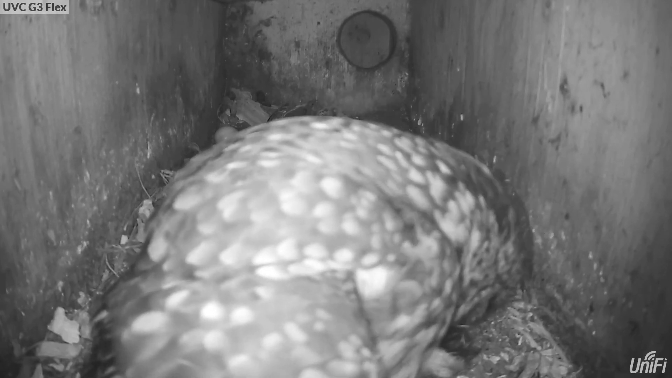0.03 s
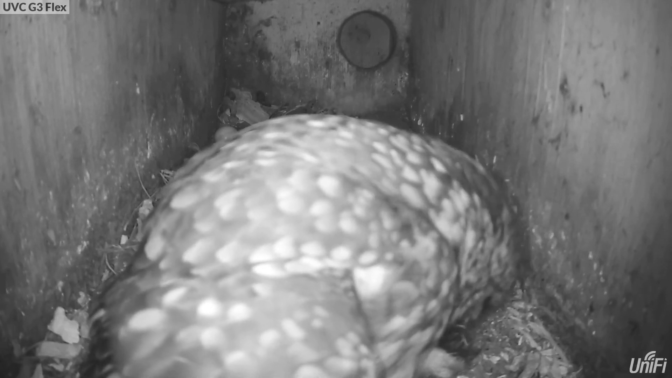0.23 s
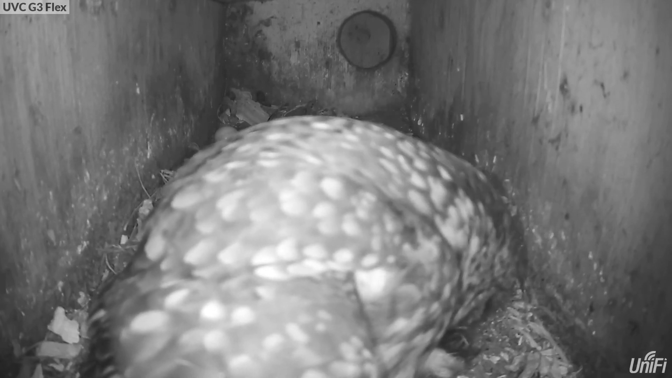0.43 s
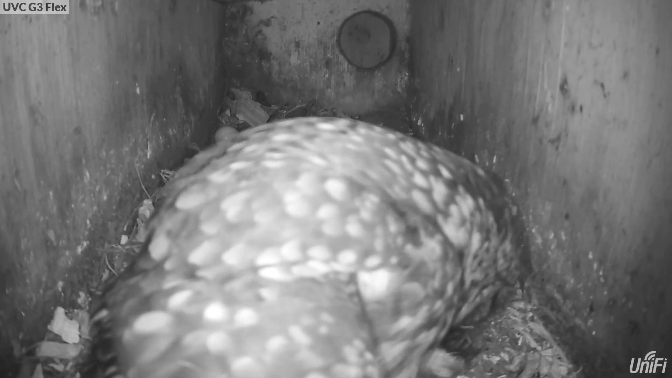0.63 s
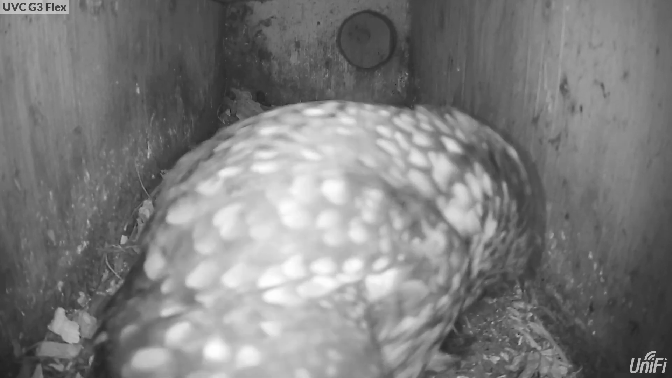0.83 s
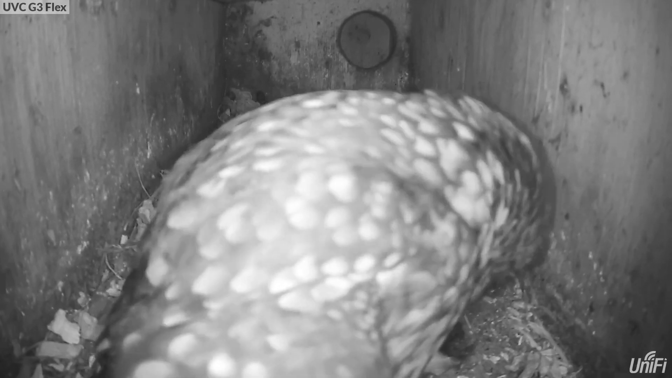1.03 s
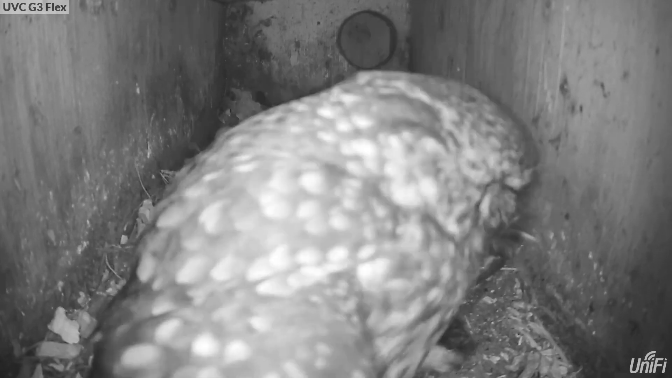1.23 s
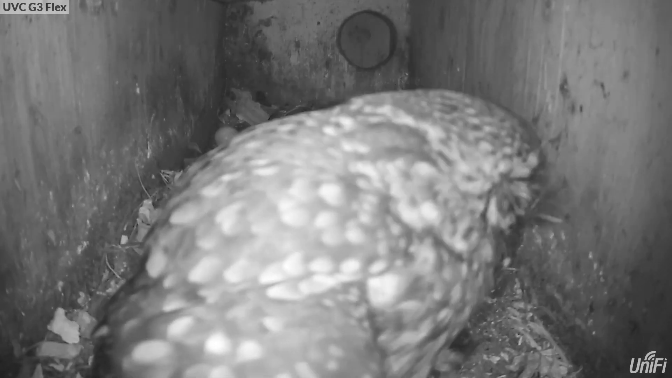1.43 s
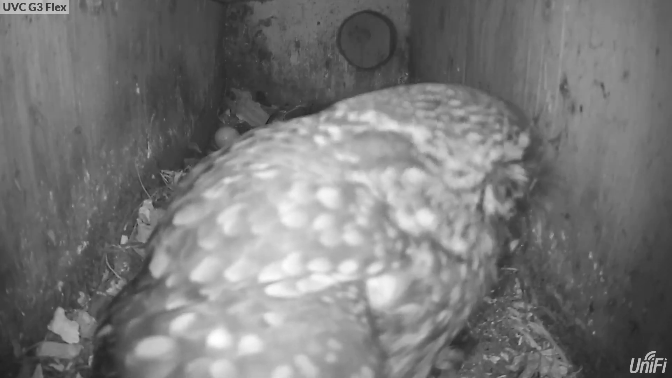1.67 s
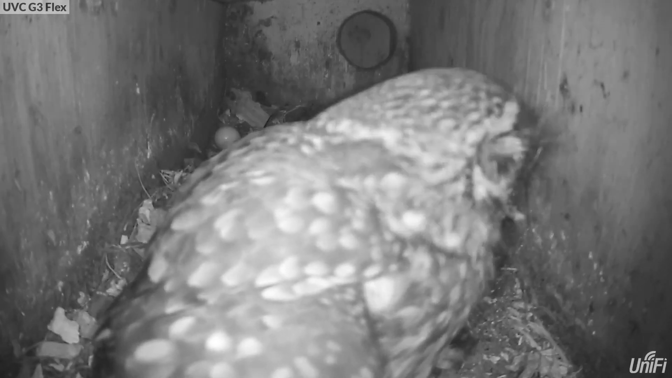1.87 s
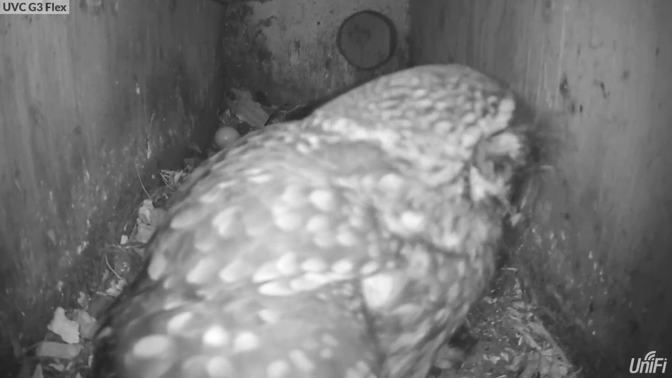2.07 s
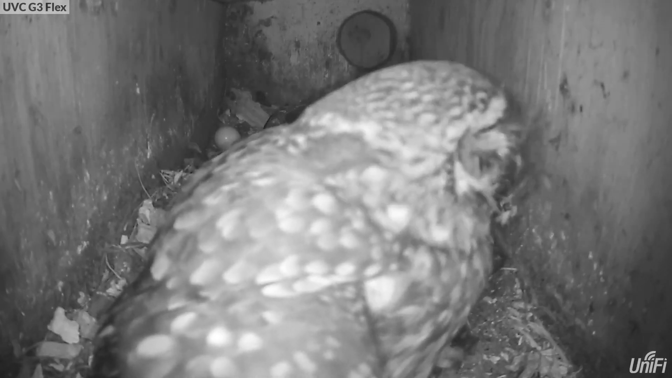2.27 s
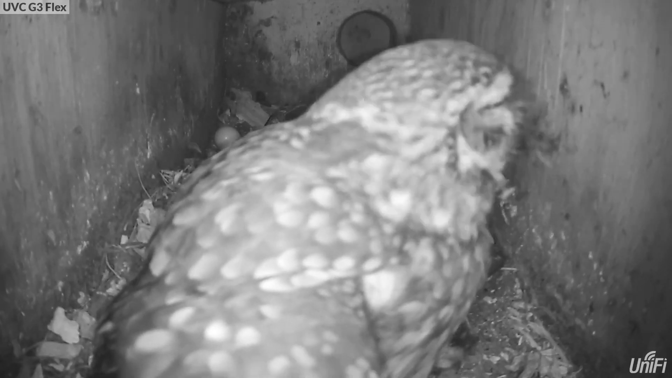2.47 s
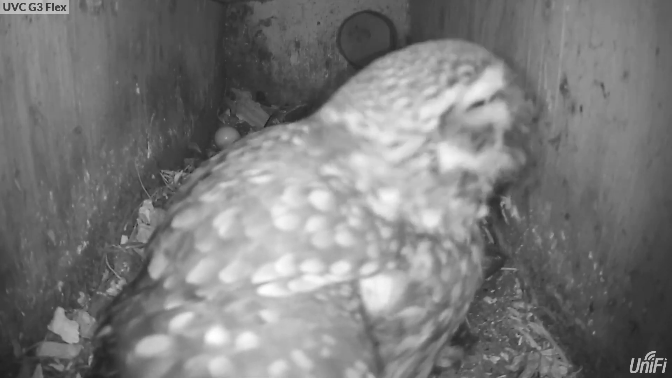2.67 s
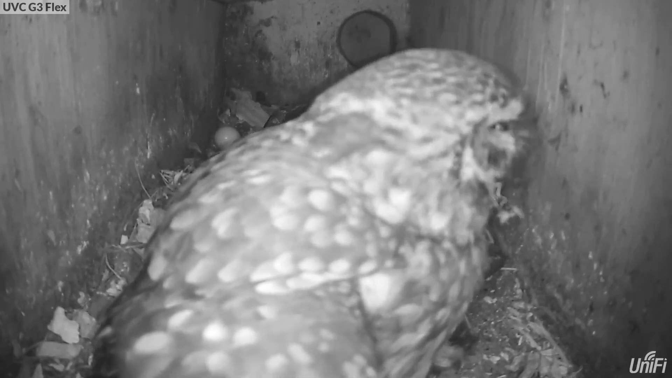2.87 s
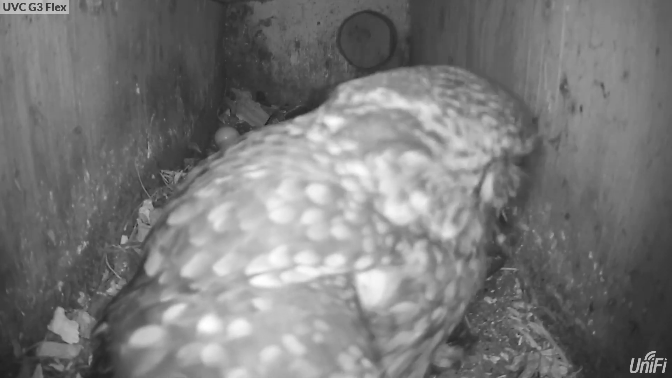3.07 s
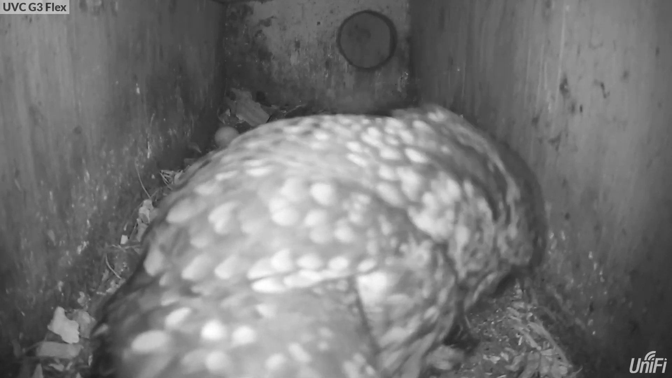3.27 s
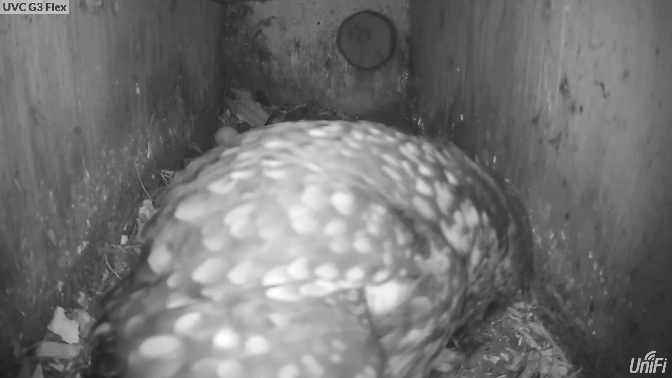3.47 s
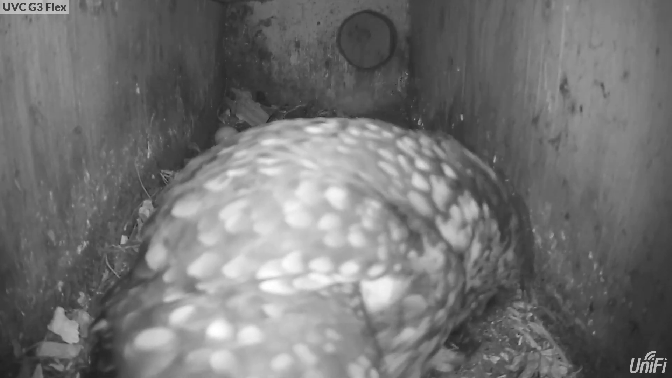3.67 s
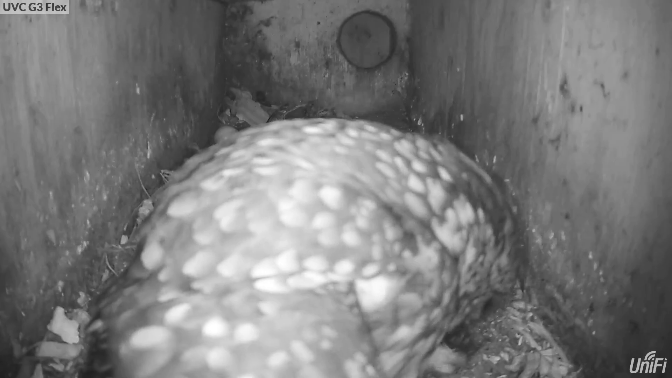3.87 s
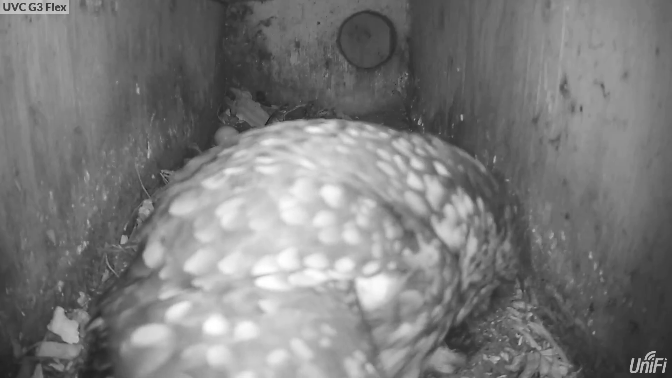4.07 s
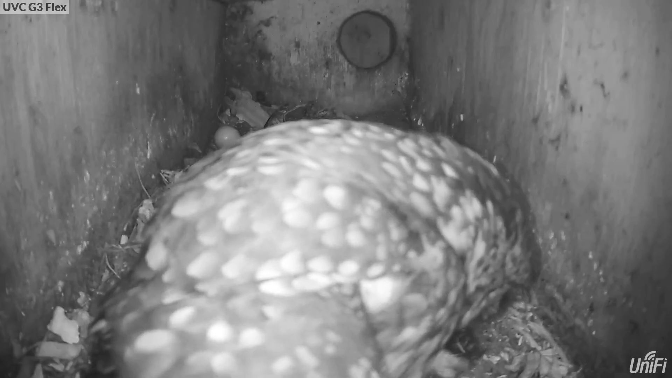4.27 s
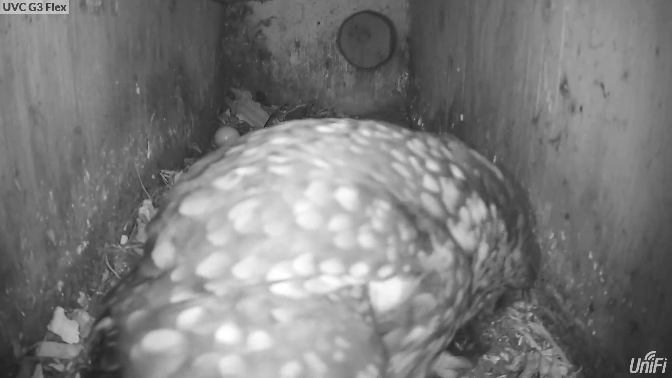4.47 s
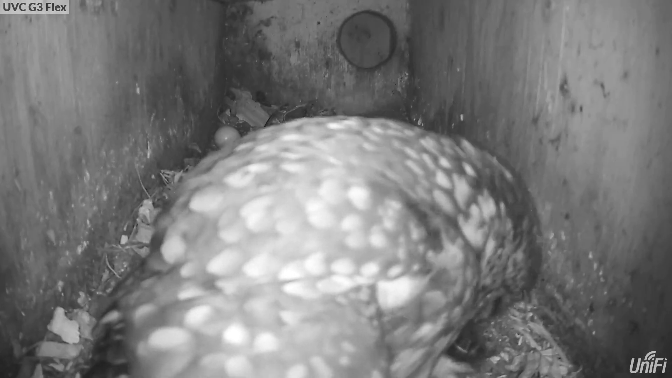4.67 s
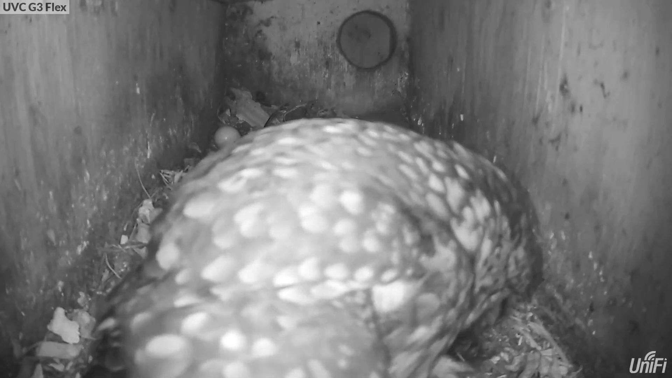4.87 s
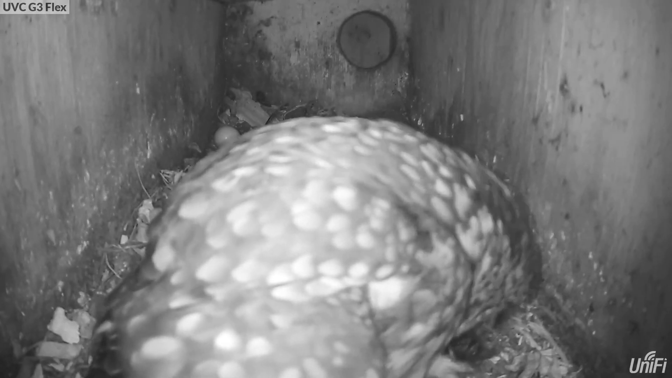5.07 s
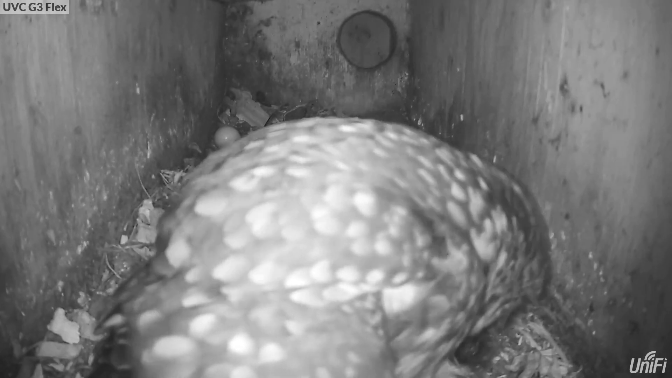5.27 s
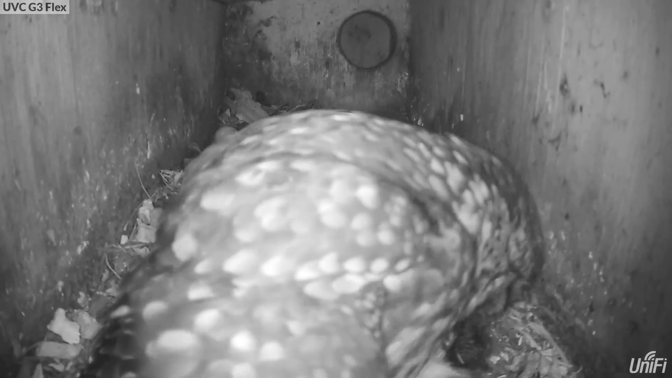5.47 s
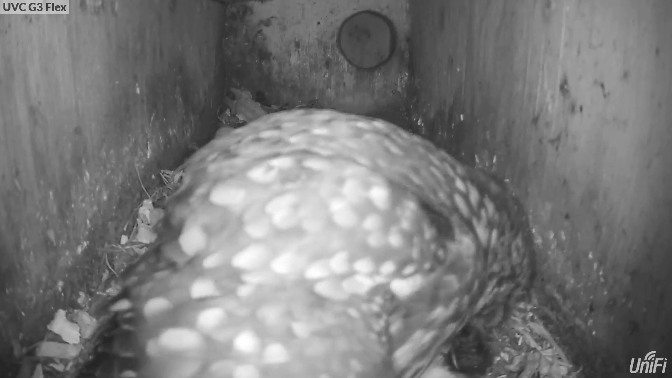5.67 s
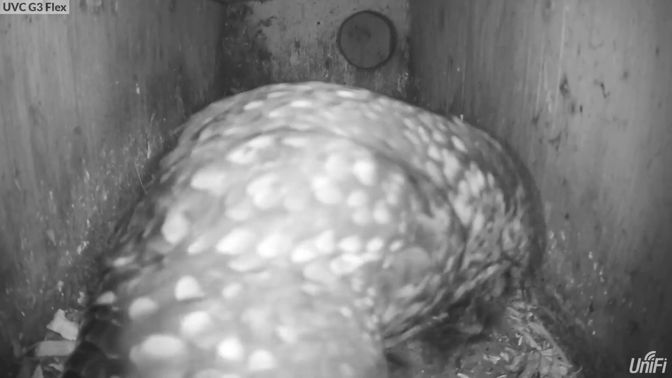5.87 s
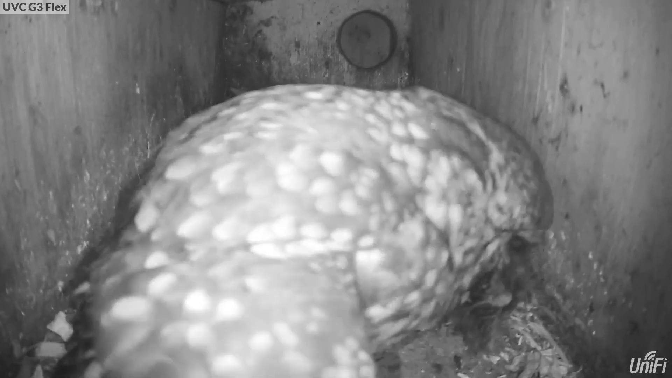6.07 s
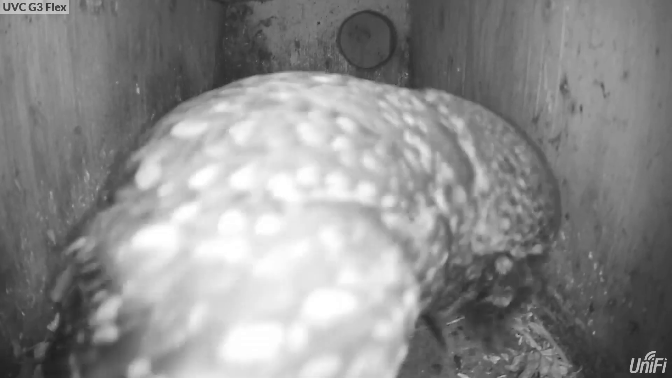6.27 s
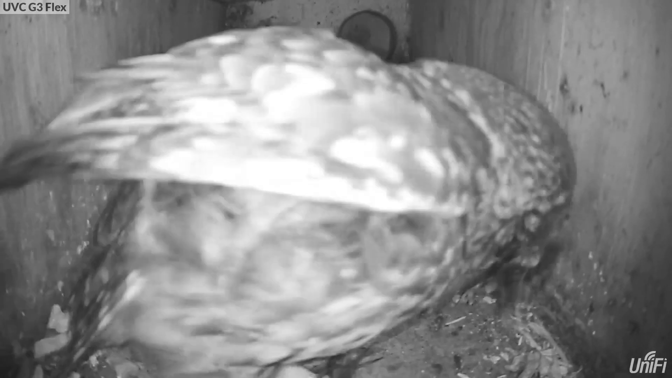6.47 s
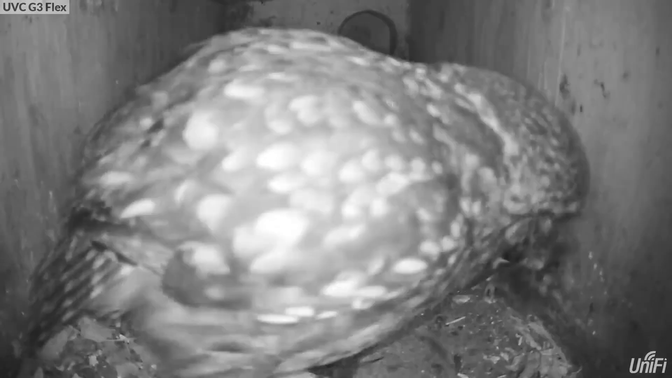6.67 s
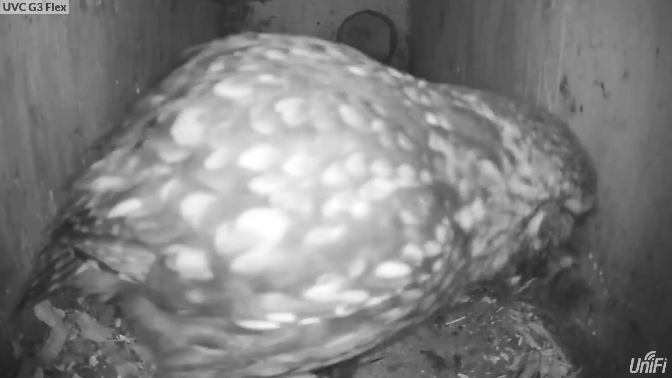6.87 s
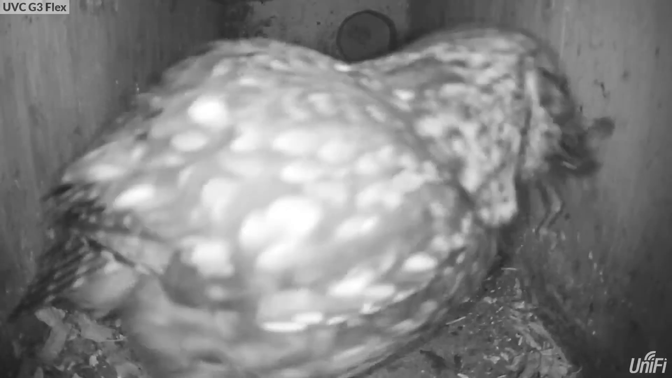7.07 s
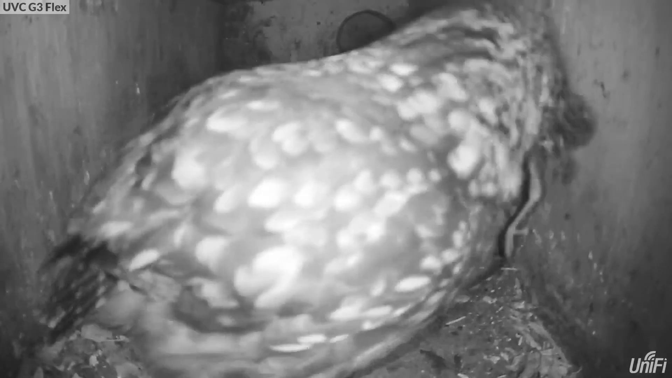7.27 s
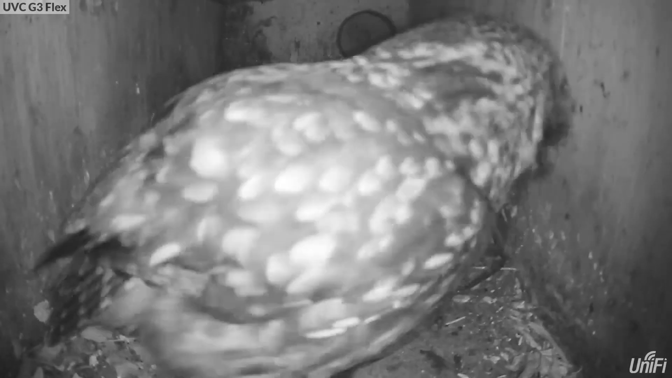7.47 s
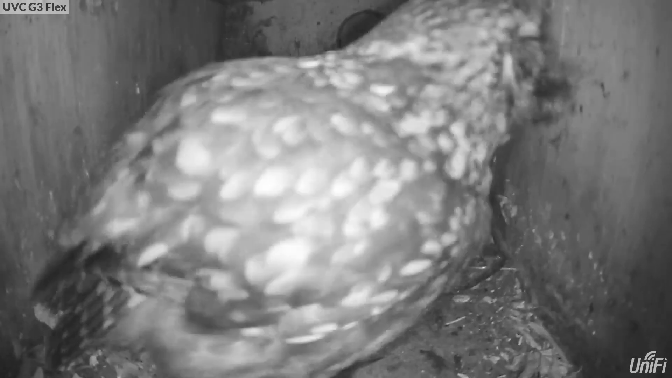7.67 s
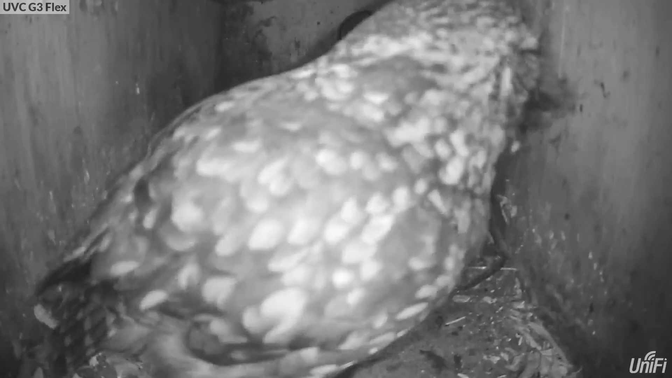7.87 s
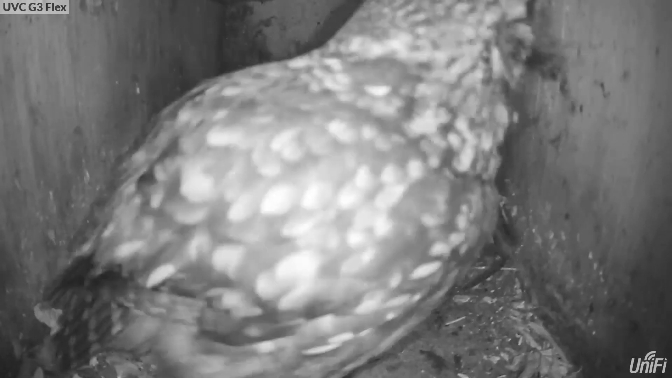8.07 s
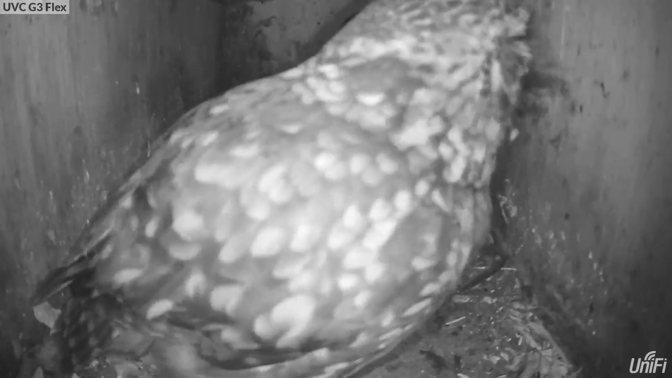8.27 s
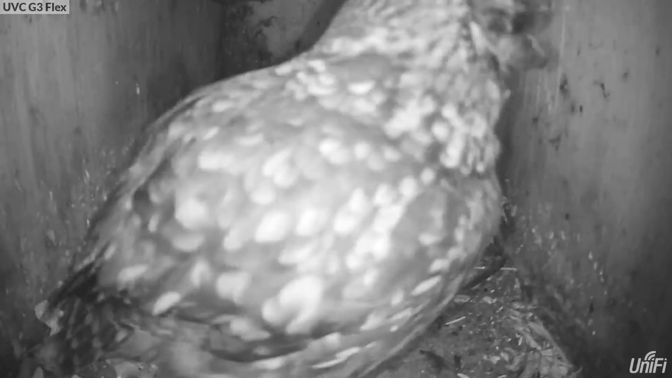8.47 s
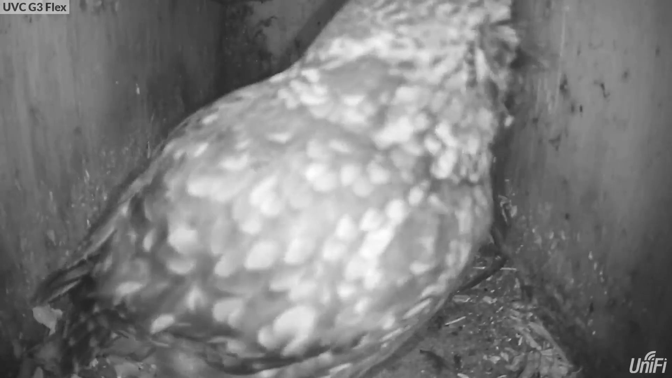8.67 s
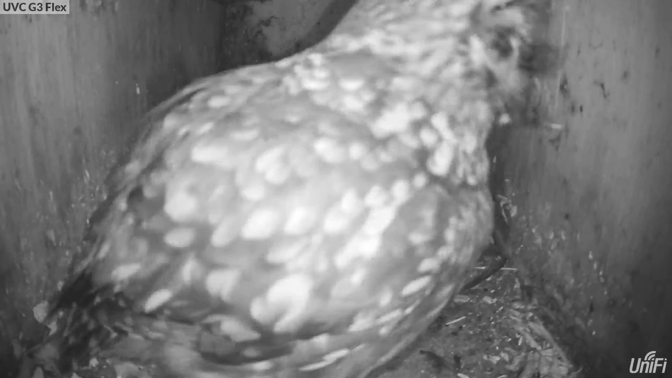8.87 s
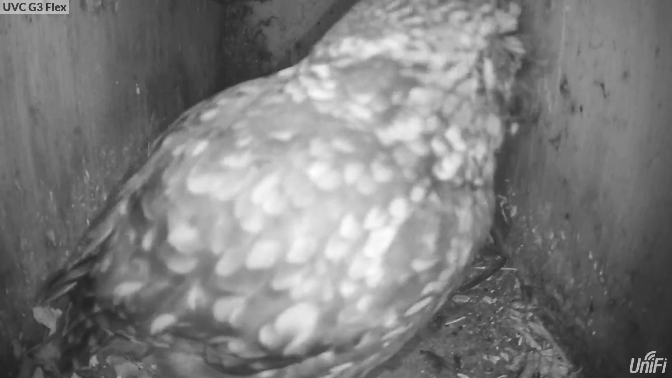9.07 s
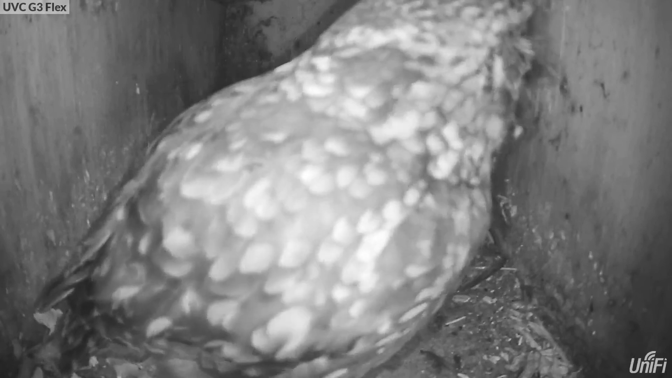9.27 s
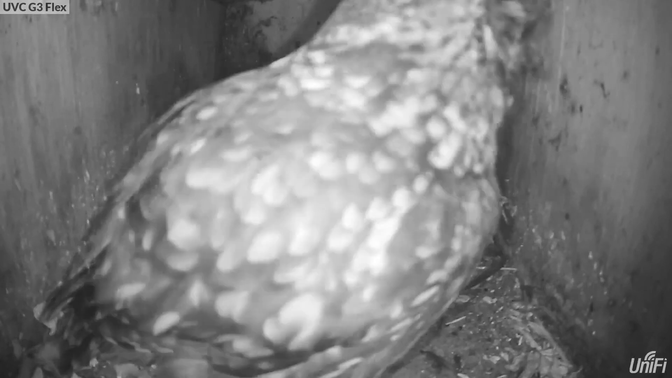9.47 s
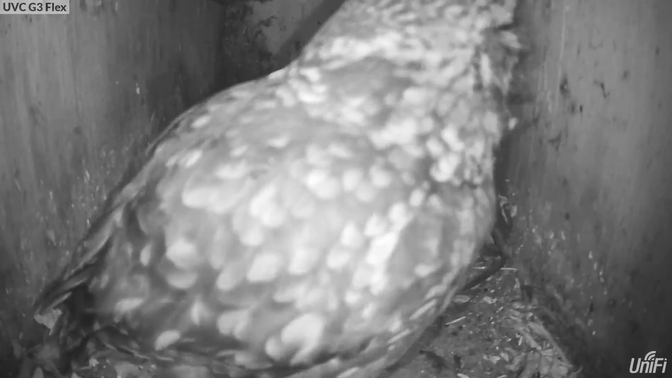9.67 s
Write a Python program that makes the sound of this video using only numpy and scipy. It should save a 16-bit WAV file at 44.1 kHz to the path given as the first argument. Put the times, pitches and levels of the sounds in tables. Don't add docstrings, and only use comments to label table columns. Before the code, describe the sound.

A microphone within a wooden box hears a large bird moving: rustling feathers, dull claw taps, crackling litter and a single heavy landing early on. Outside, a small songbird repeats fast runs of bright chips with brief buzzy notes, and fainter distant birds whistle paired rising notes. Low muffled traffic stays beneath. After a calmer middle, a busy burst of scuffling and knocks ends in near stillness.

```python
import sys
import numpy as np
from scipy import signal
from scipy.fft import rfft, irfft
from scipy.io import wavfile
from scipy.ndimage import uniform_filter1d

SR = 44100
rng = np.random.default_rng(int(sys.argv[2]) if len(sys.argv) > 2 else 0)


def elevation(decibels):
    levels = np.asarray(decibels, float)
    return 10 ** (levels / 20)


def output_pcm(signal):
    pcm = np.clip(np.atleast_2d(signal).T, -1, 1) * 32767
    wavfile.write(sys.argv[1], SR, np.round(pcm).astype(np.int16))


N = 428652
TIME = np.arange(N) / SR

# centre [Hz], width [Hz], lift [dB].
CAVITY_MODES = [(210.6, 15, 5.5), (315.5, 167, 9.5), (517, 63, 8), (1077, 123, 5), (1510, 265, 6),
                (1846, 390, 7)]


def unit(x):
    return x / np.sqrt(np.mean(x ** 2) + 1e-20)


def coloured(x, points, peaks=()):
    hz = np.maximum(np.arange(N // 2 + 1) * SR / N, 1)
    db = np.interp(np.log(hz), np.log(np.array(points)[:, 0]), np.array(points)[:, 1])
    for centre_hz, width_hz, lift_db in peaks:
        db += lift_db / (1 + (2 * (hz - centre_hz) / width_hz) ** 2)
    return unit(irfft(rfft(x) * elevation(db), N))


def band(x, low_hz, high_hz, order=2):
    edges = [low_hz, min(high_hz, .45 * SR)]
    return signal.sosfilt(signal.butter(order, edges, "band", fs=SR, output="sos"), x)


def lowpass(x, hz):
    return signal.sosfilt(signal.butter(2, hz, fs=SR, output="sos"), x)


def sine(hz):
    return np.sin(2 * np.pi * np.cumsum(hz) / SR)


def drift(rate):
    knots = rng.standard_normal(3000)
    return np.interp(TIME * rate, np.arange(len(knots)), knots)


def ring(clicks, hz, t60):
    r, w = elevation(-60 / (t60 * SR)), 2 * np.pi * hz / SR
    return signal.lfilter([0, np.sin(w)], [1, -2 * r * np.cos(w), r * r], clicks + 1e-18)


def grains(per_s, spread_db):
    sizes = elevation(spread_db * np.minimum(rng.exponential(1, N), 4)) * rng.standard_normal(N)
    return unit(sizes * (rng.random(N) < per_s / SR))


def add(out, s, sound):
    i = int(round(s * SR))
    out[i:i + len(sound)] += sound[:N - i]


def echoes(x, t60, wet_db, lumpy_db=0):
    trunk_gap_s = 0.0132
    t = np.arange(int(.3 * SR)) / SR
    tail = rng.standard_normal(len(t)) * elevation(-60 * t / t60) * np.tanh(t / 0.00056)
    tail *= elevation(lumpy_db * np.cos(2 * np.pi * t / trunk_gap_s))
    return x + elevation(wet_db) * signal.fftconvolve(x, tail / np.sqrt(np.sum(tail ** 2)))[:N]


def night_air():
    # time [s], far engine [dB], traffic [dB], hiss [dB].
    air_levels = [
        (0.0, -82.5, -54, -68.5),
        (7.52, -68.5, -55, -67.5),
        (9.72, -81, -53.5, -69.5),
    ]
    # frequency [Hz], level [dB].
    wash_outline = [(15, -47), (25, -70.5), (53, 0.5), (144, -7.5), (209, -1.5), (253, -12), (457, -10.5),
                    (509, -10.5), (666, -10.5), (1050, -6.5), (1380, -15.5), (1800, -17), (2170, -18),
                    (11200, -24.5), (15500, -31.5)]
    rows = np.array(air_levels)
    engine_db, traffic_db, hiss_db = [np.interp(TIME, rows[:, 0], column) for column in rows.T[1:]]
    wash = coloured(rng.standard_normal(N), wash_outline, CAVITY_MODES)
    low = lowpass(wash, 2300)
    engine = unit(ring(rng.standard_normal(N), 64.2, 1.0))
    traffic = elevation(traffic_db - 5.5 + 2.0 * drift(7.9)) * low
    hiss = elevation(hiss_db + 14.0) * (wash - low)
    return traffic + hiss + elevation(engine_db + 3.0) * engine


def whistles(tables, waver_db):
    out, flutter, waver = np.zeros(N), 1 + 0.0024 * drift(55), elevation(waver_db * drift(40))
    for rows in tables:
        s, hz, db = np.transpose(rows)
        span = slice(int(s[0] * SR), int(s[-1] * SR))
        t = TIME[span]
        fade = np.clip(np.minimum(t - s[0], s[-1] - t) / 0.0035, 0, 1)
        level = np.sqrt(2) * fade * elevation(np.interp(t, s, db)) * waver[span]
        out[span] += level * sine(np.interp(t, s, hz) * flutter[span])
    return out


def far_birds():
    # start [s], top [Hz], level [dB], second note after [s], its level [dB].
    paired = [
        (1.852, 3435, -65, .088, -62),
        (2.295, 3450, -62.5, .09, -61),
        (2.742, 3350, -61.5, 0.093, -62),
        (3.19, 3410, -64, 0.087, -65),
        (3.63, 3330, -68.5, .088, -68),
        (4.124, 3276, -66, 0.089, -66),
    ]
    # start [s], lowest [s], highest [s], end [s], lowest share of top pitch.
    hooks = [
        (.002, 0.0082, .061, 0.074, .85),
        (0.00104, 0.0156, .054, 0.068, .815),
    ]
    # start [s], end [s], start [Hz], end [Hz], level [dB].
    glide_rows = [(0, .05, 1745, 1700, -65), (0, .07, 1460, 1450, -71), (.12, .2, 1450, 1450, -71),
                  (.07, .145, 1735, 1730, -65), (.265, .35, 1710, 1690, -63), (.49, .535, 1950, 1990, -70),
                  (.012, .03, 2820, 2800, -72), (.085, .105, 3600, 3600, -69),
                  (.105, .125, 2790, 2800, -72), (.145, .26, 1735, 1715, -57),
                  (.179, .206, 3560, 3600, -68), (.2, .22, 2800, 2800, -72), (.2, .303, 1800, 1938, -59.5),
                  (.297, .418, 1938, 2010, -58), (.423, .445, 3900, 3350, -69),
                  (.515, .56, 2690, 2800, -72), (.55, .59, 2790, 2900, -66), (.585, .64, 2900, 2960, -65),
                  (.974, 1.113, 2240, 2060, -72), (1.108, 1.173, 2040, 1944, -59),
                  (1.802, 1.972, 2040, 2170, -74), (1.993, 2.053, 2330, 2495, -65),
                  (6.5, 6.57, 2020, 2270, -69), (6.56, 6.63, 2250, 2620, -65),
                  (7.029, 7.09, 1850, 2050, -59), (7.187, 7.42, 2220, 2080, -67),
                  (7.28, 7.35, 3990, 4010, -67), (7.29, 7.365, 3800, 3800, -71),
                  (7.333, 7.46, 1745, 1750, -59), (7.39, 7.46, 4660, 4660, -72),
                  (7.59, 7.68, 5280, 5270, -73), (7.7, 7.755, 4600, 4550, -80),
                  (7.72, 7.76, 3480, 3560, -73), (7.755, 7.848, 4020, 3990, -68),
                  (7.93, 7.98, 4680, 4680, -79), (8.245, 8.32, 4070, 4010, -68),
                  (8.27, 8.335, 3800, 3700, -72), (8.478, 8.56, 3890, 3870, -78),
                  (9.617, 9.7, 4390, 4360, -77)]
    slur_db, top_db, dip_db = 2.0, -2, 3
    pairs = []
    for second, (start, lowest, highest, end, foot) in enumerate(hooks):
        t = np.linspace(start, end, num=24)
        swing = np.sin(np.pi / 2 * (t - lowest) / (highest - lowest)) ** 2
        share = foot + (1 - foot) * swing
        db = slur_db + top_db * (t - start) / (highest - start) - dip_db * 4 * swing * (1 - swing)
        for row in paired:
            times = row[0] + second * row[3] + t
            pairs.append(np.transpose([times, row[1] * share, db + row[2 + 2 * second]]))
    glides = [[(s, hz, db), (end, end_hz, db)] for s, end, hz, end_hz, db in glide_rows]
    far_pairs = echoes(whistles(pairs, waver_db=1.5), .15, -4.0)
    return far_pairs + echoes(whistles(glides, waver_db=1.5), .25, -6.0)


def thin_whistle():
    # time [s], pitch [Hz], level [dB].
    thin_notes = [
        [(6.272, 8980, -55), (6.285, 8630, -55), (6.32, 8400, -57), (6.45, 8210, -54), (6.66, 7910, -55),
         (6.675, 7910, -63)],
    ]
    return whistles(thin_notes, waver_db=5.5)


def buzzes():
    # start [s], level [dB].
    buzz_times = [
        (.963, -54.5),
        (4.03, -54),
        (7.73, -56.5),
        (9.11, -66.5),
    ]
    # time [s], upper voice [Hz], lower voice [Hz], level [dB].
    voices = [(0, 8740, 7080, -9), (.006, 8440, 7980, -8), (.025, 8450, 7960, -1.5),
              (.035, 8950, 7900, -12), (.05, 7900, 7350, -6), (.062, 8550, 7270, -18),
              (.095, 8100, 7150, -19)]
    out, rows = np.zeros(N), np.array(voices)
    t = np.arange(int(rows[-1, 0] * SR)) / SR
    upper_hz, lower_hz, db = [np.interp(t, rows[:, 0], column) for column in rows.T[1:]]
    note = sine(upper_hz) + elevation(3.0) * sine(lower_hz)
    flutter = 1 + .5 * np.sin(2 * np.pi * 130 * t)
    for s, level_db in buzz_times:
        add(out, s, elevation(level_db + db) * note * flutter)
    return out


def chip_runs():
    # time [s], peak level [dB].
    runs = [
        [(1.1802, -40), (1.2236, -37), (1.2805, -39), (1.3563, -40), (1.4052, -40.5), (1.4691, -42.5),
         (1.5449, -43), (1.6162, -44), (1.6906, -43.5), (1.7814, -46.5), (1.8776, -48)],
        [(2.9482, -38.5), (2.9966, -38.5), (3.0664, -41), (3.1403, -41.5), (3.2056, -41.5), (3.2735, -44.5),
         (3.3593, -42.5), (3.4291, -43), (3.5034, -44), (3.6316, -45.5)],
        [(4.6897, -40), (4.807, -43.5), (4.8633, -41), (4.9282, -43), (5.01, -44), (5.0923, -43), (5.229, -43)],
        [(6.8144, -41), (6.8763, -42.5), (6.982, -42), (7.0384, -42.5), (7.1082, -45), (7.207, -46),
         (7.2993, -46.5), (7.3711, -48.5), (7.4914, -47)],
        [(8.3764, -42), (8.4552, -41.5), (8.5719, -42.5), (8.6403, -42.5), (8.7665, -43)],
    ]
    # fresh [Hz], tired [Hz].
    sagging = [
        (7750, 7000),
        (7750, 7200),
        (7500, 7250),
        (7250, 7120),
        (7350, 7400),
    ]
    sag_s = 0.16
    rows = []
    for run, (fresh_hz, tired_hz) in zip(runs, sagging):
        times, db = np.transpose(run)
        fresh = np.exp(-(times - times[0]) / sag_s)
        held_hz = tired_hz + (fresh_hz - tired_hz) * fresh
        rows += zip(times, db + 6, held_hz, 5274 - 1510 * (1 - fresh), -13 + 6 * (1 - fresh))
    return rows


def chips():
    sweep_s = .0045
    out, t = np.zeros(N), np.arange(int(.08 * SR)) / SR
    wobble = uniform_filter1d(rng.standard_normal((60, len(t))), size=60, axis=1) * np.sqrt(60)
    rise = np.clip(t / sweep_s, 0, 1)
    after = np.maximum(t - .7 * sweep_s, 0)
    for k, (s, db, held_hz, foot_hz, foot_db) in enumerate(chip_runs()):
        sweep = sine(foot_hz + (9100 - foot_hz) * rise ** .8) * elevation(foot_db * (0.5 - rise))
        sweep *= np.tanh(9 * rise) * np.tanh(9 * (1 - rise))
        hoarse_hz = 130 * wobble[k]
        held = sine(held_hz - 600 * np.exp(-after / 0.0019) + hoarse_hz)
        held *= np.exp(-after / 0.011) * np.tanh(after / 0.0016)
        top = sine(.6 * held_hz + 4000 + 500 * np.exp(-after / 0.0043) - hoarse_hz)
        top *= np.exp(-after / 0.0032) * np.tanh(after / 0.0023)
        chip = elevation(-1) * sweep + elevation(-5.0) * held + elevation(-0.5) * top
        add(out, s - .5 * sweep_s, elevation(db - 8.5) * chip)
    return out * elevation(2 * drift(250))


def pressure(rows, column):
    out = np.zeros(N)
    for row in rows:
        along = np.arange(int(row[1] * SR)) / (row[1] * SR)
        add(out, row[0], elevation(row[column]) * np.tanh(along / 0.18) * np.tanh((1 - along) / 0.39))
    return out


def shuffle():
    # start [s], length [s], floor board [dB], wall scrape [dB].
    shifts = [(.39, 0.082, -58, -67), (.52, 0.17, -59, -55.5), (.66, 0.15, -65, -58),
              (.78, 0.114, -60, -56.5), (.9, 0.078, -45, -53.5), (.975, 0.081, -71, -54),
              (1.04, 0.22, -78, -63.5), (1.38, 0.19, -83, -61.5), (3.63, 0.072, -58, -82.5),
              (3.85, 0.049, -52, -80), (3.95, 0.57, -67, -75), (4.5, 0.13, -69, -58.5),
              (4.68, 0.088, -56.5, -79), (5.08, 0.25, -58, -60), (5.28, 0.152, -51.5, -59),
              (5.44, 0.12, -58.5, -61.5), (5.56, 0.12, -52.5, -53.5), (5.67, 0.079, -45, -55.5),
              (5.76, 0.069, -42, -53.5), (5.86, 0.11, -55.5, -58), (6.04, 0.21, -53.5, -60),
              (6.25, 0.22, -68, -59), (6.41, 0.23, -64, -62), (6.67, 0.065, -67, -51),
              (6.93, 0.091, -60, -55.5), (7.43, 0.11, -63, -64), (7.8, 0.11, -64, -62.5),
              (9.24, 0.076, -61, -57.5)]
    # start [s], length [s], level [dB], brightness [dB].
    strokes = [(0.576, 0.1, -52.5, -2.5), (0.665, 0.068, -67, 3), (0.847, 0.12, -54.5, -1.5),
               (0.963, 0.17, -58, -3.5), (1.1, 0.18, -67, 0.5), (2.314, 0.1, -69, 3),
               (2.521, 0.052, -59, -9), (4.543, 0.058, -59.5, -0.5), (4.653, 0.036, -58.5, -5),
               (5.158, 0.064, -57, -3), (5.263, 0.036, -53.5, -8), (5.31, 0.097, -60, -0.5),
               (5.431, 0.055, -54, 0), (5.556, 0.13, -54, 2), (5.643, 0.24, -58.5, -4),
               (5.808, 0.34, -61.5, -2), (6.042, 0.11, -57, 5.5), (6.14, 0.11, -58.5, 4),
               (6.316, 0.069, -60, 2), (6.383, 0.072, -57.5, -3), (6.666, 0.061, -62, 4),
               (6.921, 0.083, -57, -1.5), (7.448, 0.058, -59, -2.5), (7.805, 0.064, -62, -1),
               (7.983, 0.035, -65.5, -1), (8.237, 0.054, -59.5, -3), (9.274, 0.088, -65.5, -1)]
    # frequency [Hz], level [dB].
    feather_outline = [(1500, 2), (3000, -4), (5000, -5), (8000, -4), (11000, -7), (13500, -12),
                       (15200, -7)]
    push, drag = grains(300, 1.76), grains(2600, 1.8)
    rumble = ring(push, 300.5, 0.22) + elevation(6.5) * ring(push, 439, 0.035)
    rumble += elevation(-1.5) * ring(drag, 380, 0.1) + elevation(-12.0) * ring(drag, 231, 0.17)
    wall_outline = [(500, -6.0), (700, 5.0), (1900, 0.0), (2400, -6.0), (4500, -6.0), (6000, -57.0)]
    scrape = coloured(drag, wall_outline, CAVITY_MODES)
    weight = pressure(shifts, column=2) * unit(rumble) + pressure(shifts, column=3) * scrape

    barbs = rng.standard_normal(N) + .7 * grains(2500, 3.5)
    brush = coloured(barbs, [(600, -1.0)] + feather_outline + [(16000, -26.0)])
    brush *= elevation(5.0 + 1.5 * drift(120))
    dull = lowpass(brush, 8000)
    sheen = [(s, length, db + bright_db) for s, length, db, bright_db in strokes]
    feathers = pressure(strokes, column=2) * dull
    feathers += pressure(sheen, column=2) * (brush - dull) * elevation(2.6 * drift(200))
    return elevation(3) * weight + feathers


def ticks():
    # time [s], peak level [dB], treble share [dB].
    snaps = [(0.605, -50, -14), (0.7011, -47, -0.5), (0.726, -47, 0), (0.8343, -47, -0.5),
             (0.8712, -27, -5), (0.8822, -22.5, -28), (0.9156, -41, -11), (0.941, -42, -17),
             (1.1072, -42.5, -2), (1.174, -39.5, -16), (1.214, -46, -5.5), (1.3355, -42, -16),
             (1.4755, -50, 4), (2.3368, -45, -12), (2.3783, -50, -1), (2.3935, -48, -15), (2.424, -47, -14),
             (2.516, -35, -2.5), (2.8113, -51, -1), (3.3448, -45, -7), (4.4097, -53, -1), (4.6012, -51, 3),
             (4.6185, -32, -7), (4.7326, -43.5, -4), (5.073, -48, -7), (5.3236, -47, -13),
             (5.3498, -48, -9), (5.3829, -52, -5), (5.4436, -36.5, -20), (5.4527, -44, -14),
             (5.4734, -37.5, -22), (5.4918, -43, -3), (5.5689, -51, -4), (5.5805, -45, -1),
             (5.6015, -41, -10), (5.6236, -49, -10), (5.7101, -33.5, -18), (5.7351, -46, -12),
             (5.7618, -26.5, -19), (5.8115, -36.5, -2), (5.8415, -45, -10), (5.858, -47, 2),
             (5.8899, -38, -22), (5.9158, -37, -8), (5.9362, -45, 4.5), (6.0333, -37, -7),
             (5.8138, -40.5, 0), (6.0659, -44, 2), (6.0779, -43, -2), (6.0929, -50, 6), (6.1124, -48, 6),
             (6.1582, -41, -9), (5.7865, -49, -1), (6.4035, -36, -1), (6.5764, -56, 0),
             (6.6197, -44.5, -10), (7.8693, -45.5, -18), (9.2706, -45.5, 1), (9.2946, -49, 4),
             (9.3306, -53, -1)]
    delay_s = .0008
    out, t = np.zeros(N), np.arange(256) / SR
    noise = rng.standard_normal((60, 256)) * t * np.exp(-t / 0.00025)
    for k, (s, db, treble_db) in enumerate(snaps):
        dull = band(noise[k], 3000, 4500) + .22 * band(noise[k], 2000, 7000)
        bright = band(noise[k], 7500, 13500)
        snap = dull / np.abs(dull).max() + elevation(treble_db + 8.5) * bright / np.abs(bright).max()
        add(out, s + delay_s, elevation(db - 0.5) * snap)
    return out


def claw_contacts():
    # time [s], peak level [dB], plank [Hz].
    thuds = [(.402, -49, 275), (.68, -58, 295), (.72, -56, 295), (.808, -49, 293), (.527, -50, 432),
             (0.784, -51, 293), (.979, -42, 211), (.983, -41.5, 287), (3.642, -49.5, 293),
             (3.861, -49.5, 288), (5.339, -43, 299), (5.379, -47.5, 420), (5.577, -43.5, 279),
             (5.734, -44, 420), (5.786, -46, 304), (5.915, -48, 296), (6.23, -50, 321)]
    # time [s], peak level [dB], plank share [dB], upper wall share [dB].
    raps = [
        (.084, -47.5, -6, -2),
        (0.256, -59, -16, 12),
        (2.641, -47, -5, -2.5),
        (5.467, -41, -9, -9),
        (6.274, -44.5, -11, -3),
        (6.399, -37, -21, -2),
        (6.644, -34.5, 0.5, -3.5),
        (6.905, -36, -3, 0.5),
        (7.526, -38.5, -4, -6),
        (7.898, -54.5, -11, 8.5),
    ]
    # time [s], peak level [dB], plank [Hz], upper wall share [dB].
    catches = [(0.8717, -29, 440, 1.5), (1.174, -55, 436, 9), (1.976, -58.5, 291, 7),
               (5.087, -46.5, 278, 1), (5.162, -49, 299, -4), (5.269, -35.5, 558, -2.5),
               (5.275, -37, 556, -3), (5.7631, -34, 435, 0), (5.779, -39, 307, 2), (5.867, -55, 374, 10),
               (6.032, -47.5, 422, 7.5), (6.1, -35.5, 442, -5), (6.403, -31.5, 1046, 2),
               (6.619, -48, 334, 6), (7.867, -49.5, 345, 9.5)]
    # time [s], peak level [dB], plank share [dB], upper wall share [dB].
    pats = [(0.996, -38, -9, -3), (1.009, -43.5, -14, -2), (1.056, -41, -18, 2.5), (1.07, -43.5, -16, 0),
            (1.145, -45, -18, 0), (5.59, -43, -15, -2), (5.642, -38.5, -15, 2), (5.677, -36.5, -18, 2),
            (5.84, -45, -15, -1), (5.963, -45, -15, 5), (6.056, -40, -15, 0), (6.107, -41, -13, 5.5),
            (6.137, -43, -15, -7), (6.166, -38, -18, -4), (6.204, -47, -18, 5), (6.702, -39, -12, -5),
            (6.941, -39, -13, -8), (6.957, -38, -12, -9)]
    wall_hz = 520
    rows = [(s, db, 5, -5.5, hz, -4) for s, db, hz in thuds]
    rows += [(s, db, plank_db, -23, wall_hz, upper_db) for s, db, plank_db, upper_db in raps]
    rows += [(s, db, -4, -2, hz, upper_db) for s, db, hz, upper_db in catches]
    return rows + [(s, db - 7.5, plank_db, -11, wall_hz, upper_db) for s, db, plank_db, upper_db in pats]


def knocks():
    # frequency [Hz], level [dB], t60 [s].
    board_modes = [(216, -5, 0.15), (298.6, -11.5, 0.21), (415, -12.5, 0.11), (445, -8.5, 0.087),
                   (596, -12, 0.07), (775, -5.5, 0.034), (930, -5.5, 0.0096), (1110, -3.5, 0.023),
                   (1723, -9.5, 0.03), (1474, -21, 0.049), (1534, -13.5, 0.027), (1591, -7, 0.027),
                   (1860, -23, 0.034)]
    out, t = np.zeros(N), np.arange(int(.15 * SR)) / SR
    mix_db = 2 * rng.normal(0, 1, (60, len(board_modes)))
    noise = rng.standard_normal((60, len(t)))
    for k, (s, wall_db, plank_db, crack_db, plank_hz, upper_db) in enumerate(claw_contacts()):
        chatter = band(noise[k] * t * np.exp(-t / 0.0016), 100, 2200)
        chatter = chatter / np.sqrt(np.sum(chatter ** 2))
        for (hz, db, t60), uneven_db in zip(board_modes, mix_db[k]):
            if hz < 600:
                share_db = plank_db - 19.0 * abs(np.log2(hz / plank_hz))
            else:
                share_db = 0 if hz < 1250 else upper_db + 2.0
            level = elevation(wall_db + share_db + .5 * db + uneven_db - 11.0)
            add(out, s, level * ring(chatter, hz, 1.32 * t60))
        plank = np.sin(2 * np.pi * plank_hz * t) * elevation(-60 * t / 0.1) * np.tanh(t / 0.0022)
        add(out, s, elevation(wall_db + plank_db + 1.0) * plank)
        tail = noise[k] * np.exp(-t / 0.0096) * np.tanh(t / 0.00094)
        woody = band(tail, 670, 1300) + elevation(upper_db - 14.0) * band(tail, 1560, 1660)
        add(out, s, elevation(wall_db + 7.0) * woody)
        crack = band(noise[k] * np.exp(-t / .004), 2300, 4700)
        add(out, s, elevation(wall_db + crack_db + 3) * crack)
    return out


def boards(push):
    # frequency [Hz], level [dB], t60 [s].
    floor_modes = [(214, -23.5, .1), (304, -7, .13), (413, -13.5, 0.056), (459, -1.5, 0.043),
                   (582, -6, 0.036), (743, -6.5, 0.029), (930, -7.5, 0.025), (1038, -8, 0.058),
                   (1450, -10, 0.037), (1610, -6.5, 0.024), (1746, -3.5, 0.0263)]
    out = np.zeros(N)
    for k, (hz, db, t60) in enumerate(floor_modes):
        sense = 1 if hz < 1200 else (-1) ** k
        out += sense * elevation(db) * ring(push, hz, t60)
    return out


def blow():
    # time [s], level [dB], hardness [Hz].
    pushes = [
        (0.8727, -35.5, 6000),
        (0.8825, -8, 2500),
        (0.885, -15, 4070),
        (0.9085, -15, 420),
        (0.9235, -25, 300),
    ]
    settle_s, muffle_db = .934, -18
    push = np.zeros(N)
    for s, db, hardness_hz in pushes:
        span = np.hanning(int(SR / hardness_hz) + 3)
        add(push, s, -elevation(db) * span / span.sum())
    damping = elevation(muffle_db * np.clip((TIME - settle_s) / 0.0068, 0, 1))
    return band(boards(push), 260, 9100, order=3) * damping


def scene():
    birds = far_birds() + thin_whistle() + echoes(buzzes(), 0.069, 2.2)
    birds += echoes(chips(), 0.09, 3.5, lumpy_db=3.5)
    owl = shuffle() + echoes(ticks(), 0.026, -8.0) + knocks()
    owl = signal.sosfilt(signal.butter(4, 195, "highpass", fs=SR, output="sos"), owl)
    return (night_air() + birds + owl + blow())[None]


def band_limit(x):
    return signal.sosfilt(signal.butter(12, 16400, fs=SR, output="sos"), x)


def record(dry):
    top_cut = signal.cheby2(12, 60, 16000, fs=SR, output="sos")
    return band_limit(signal.sosfilt(top_cut, dry))


dry = scene()
out = record(dry)
output_pcm(out)
```